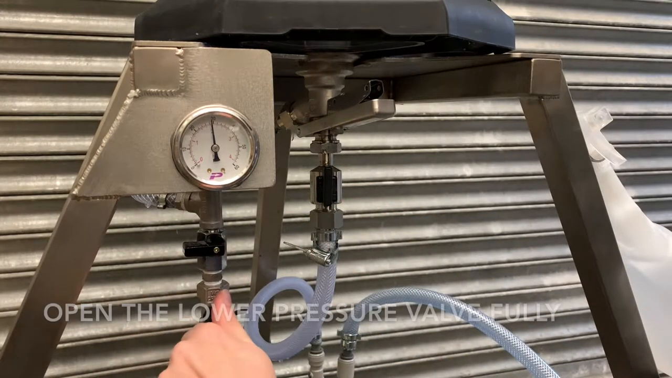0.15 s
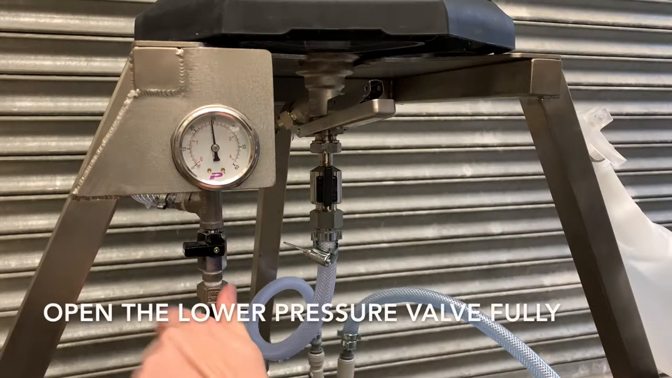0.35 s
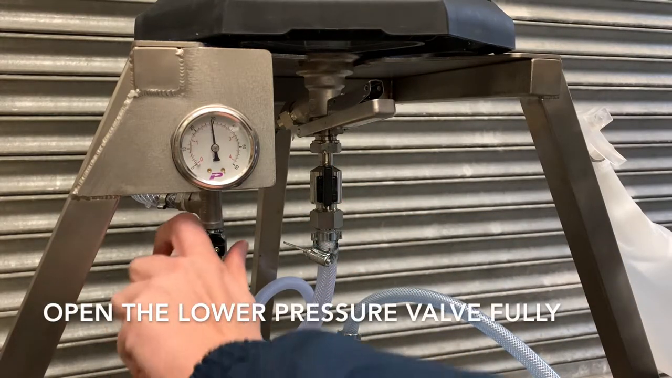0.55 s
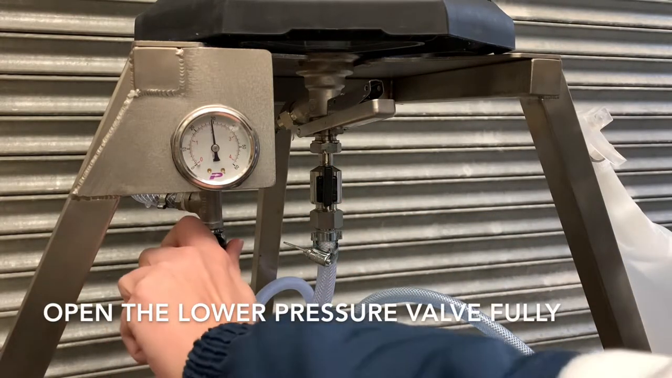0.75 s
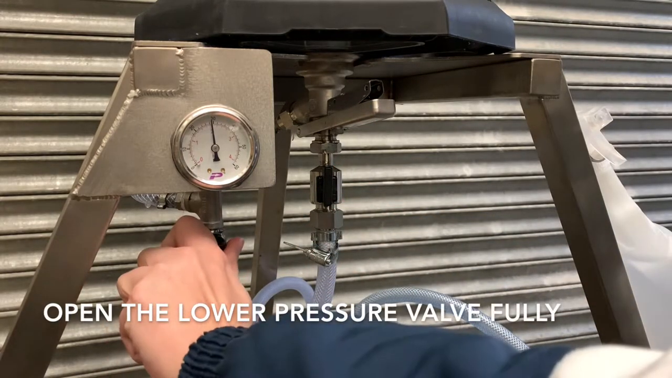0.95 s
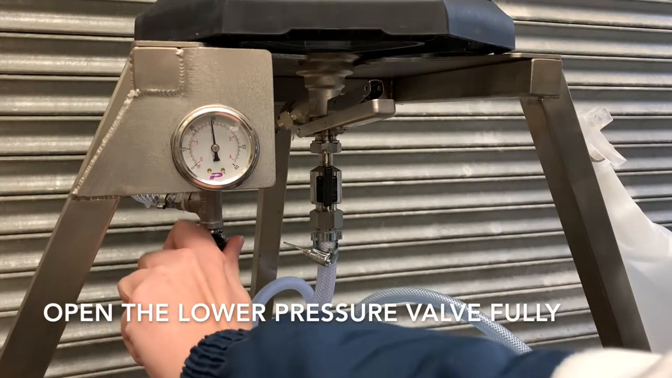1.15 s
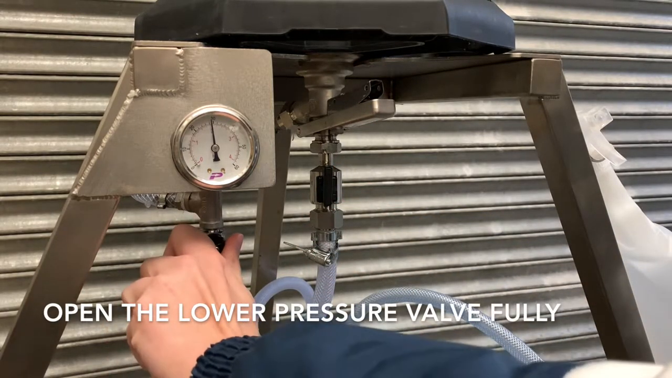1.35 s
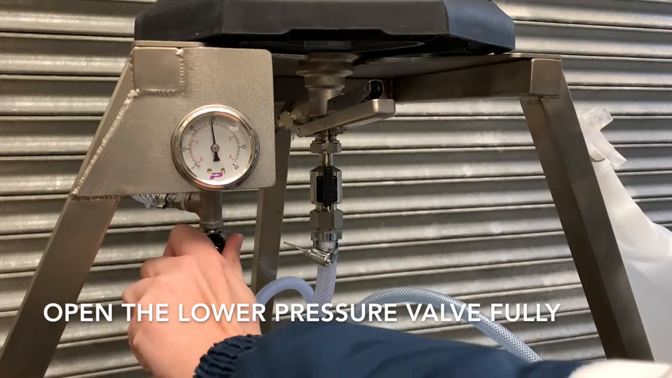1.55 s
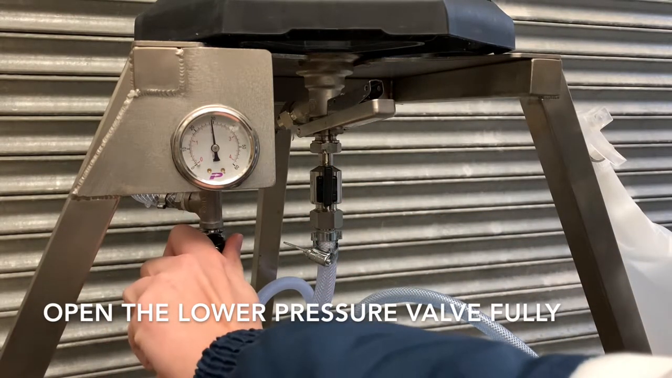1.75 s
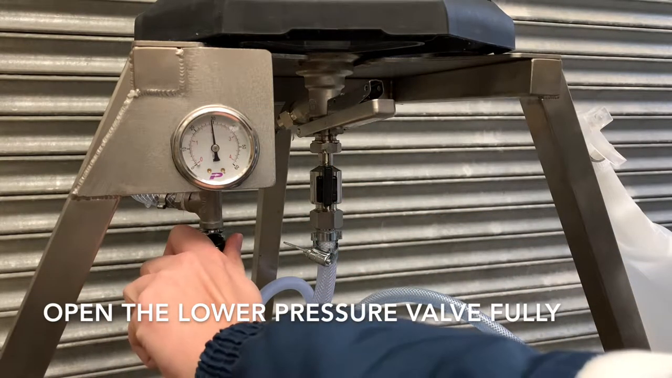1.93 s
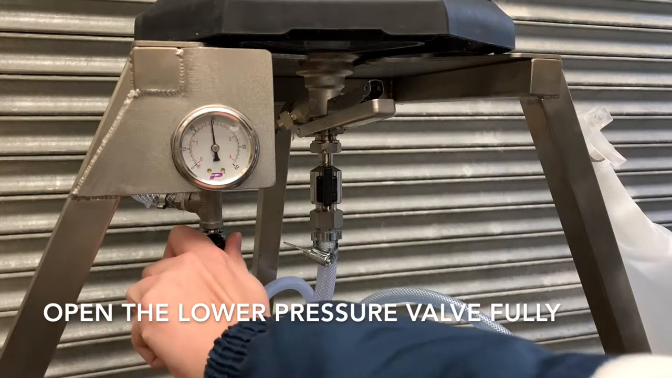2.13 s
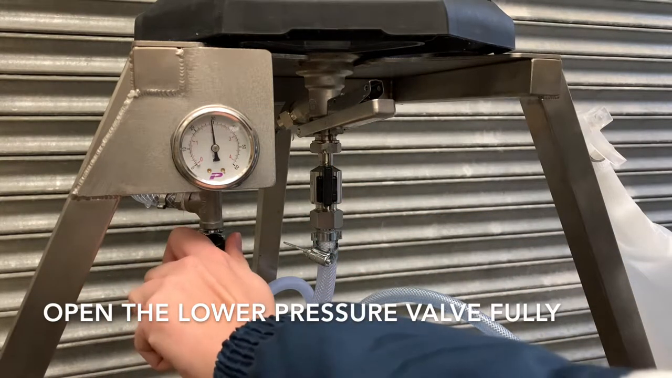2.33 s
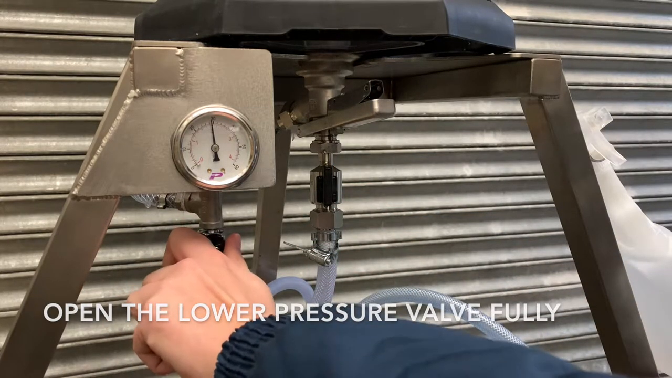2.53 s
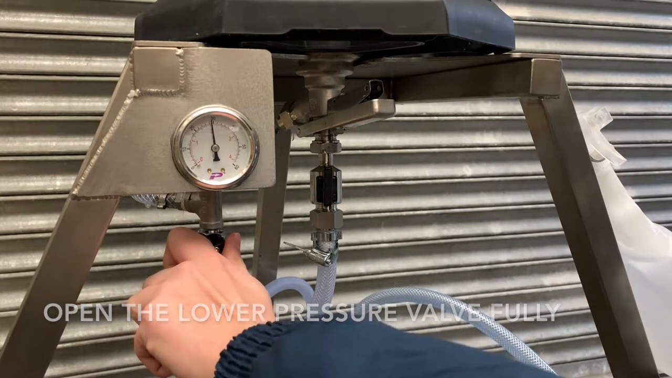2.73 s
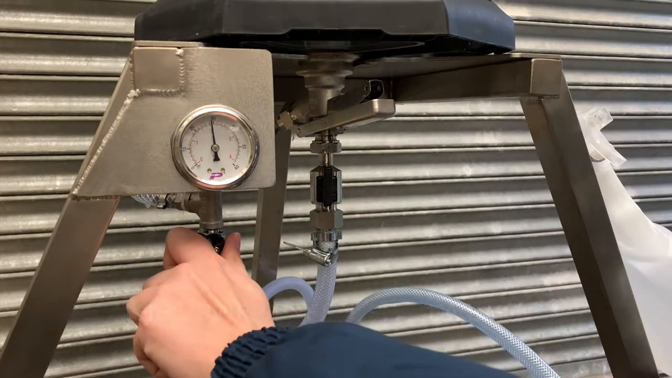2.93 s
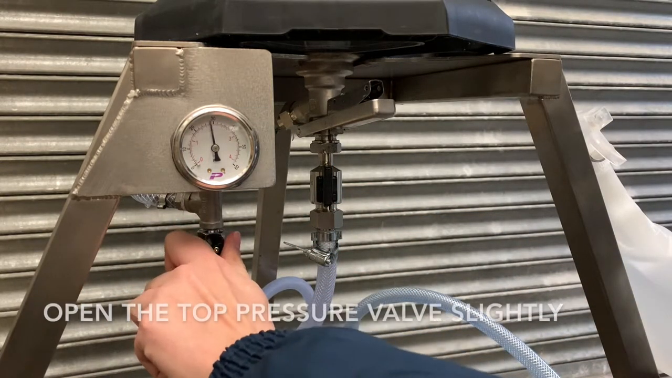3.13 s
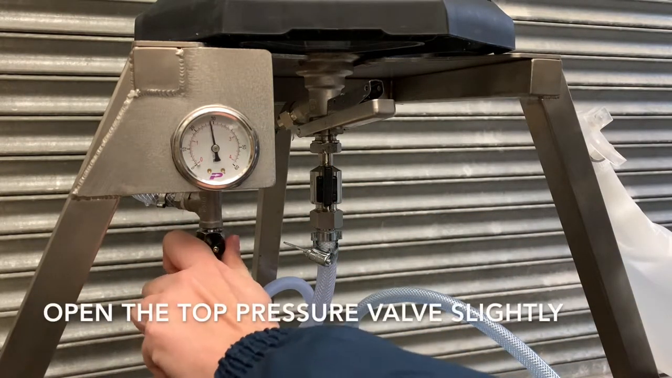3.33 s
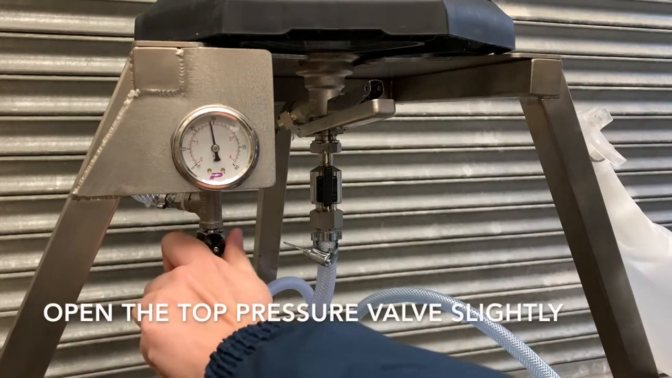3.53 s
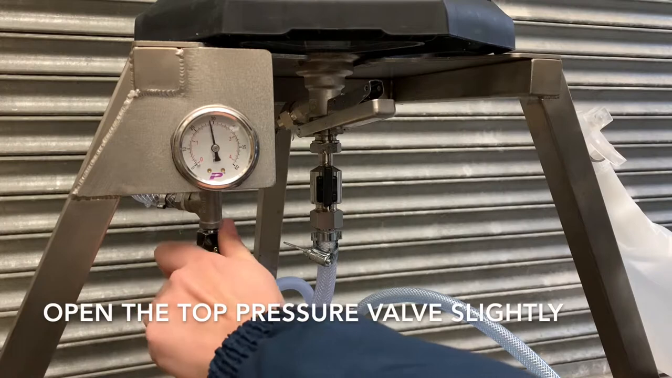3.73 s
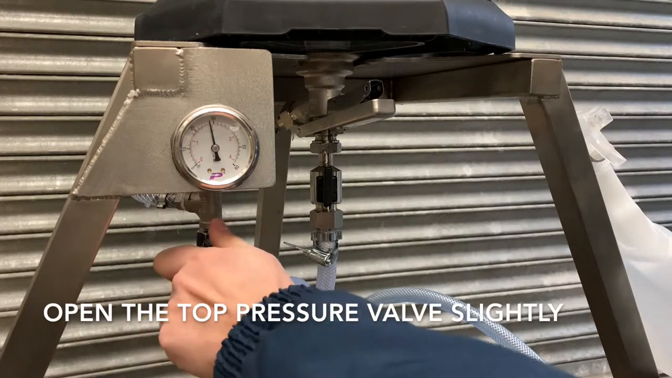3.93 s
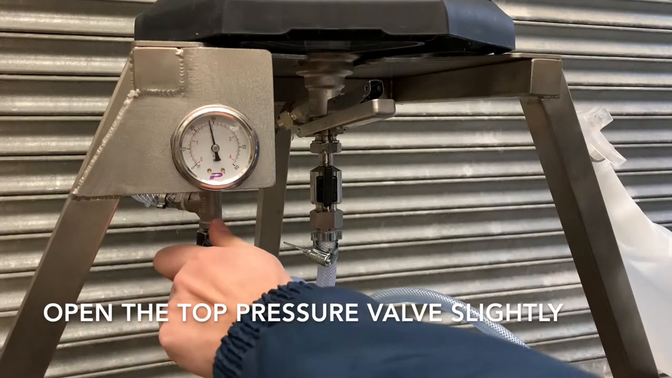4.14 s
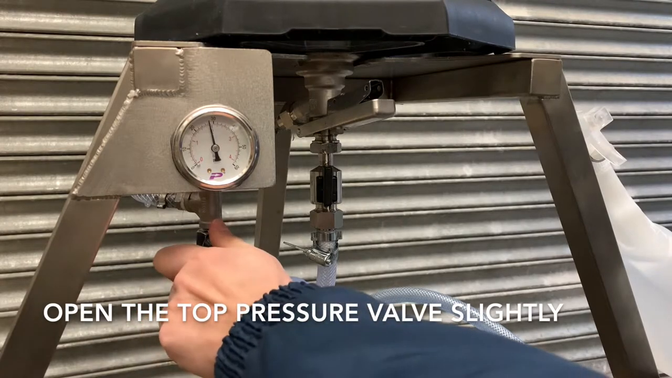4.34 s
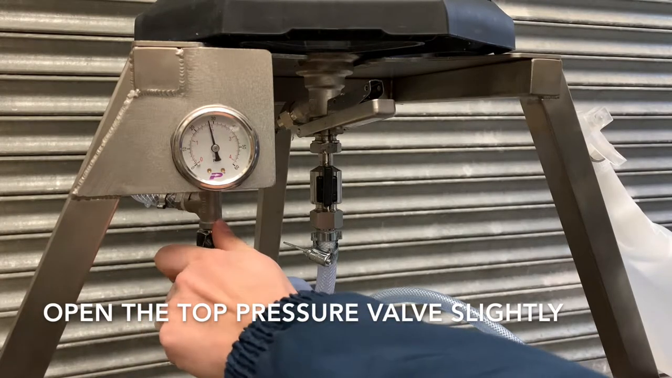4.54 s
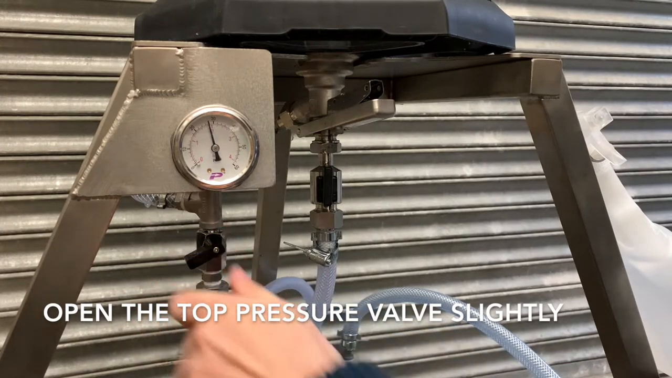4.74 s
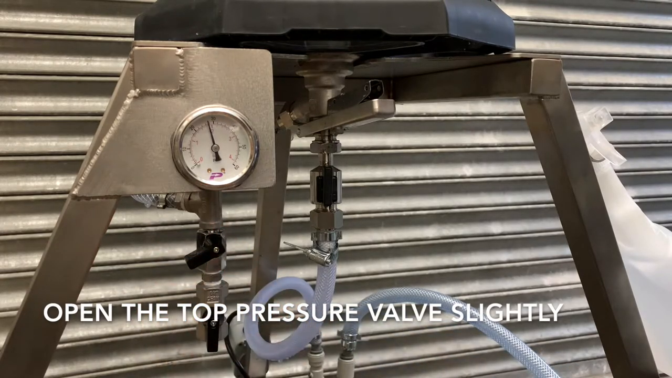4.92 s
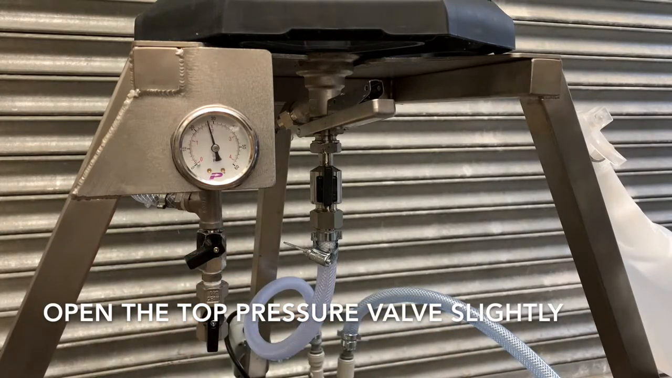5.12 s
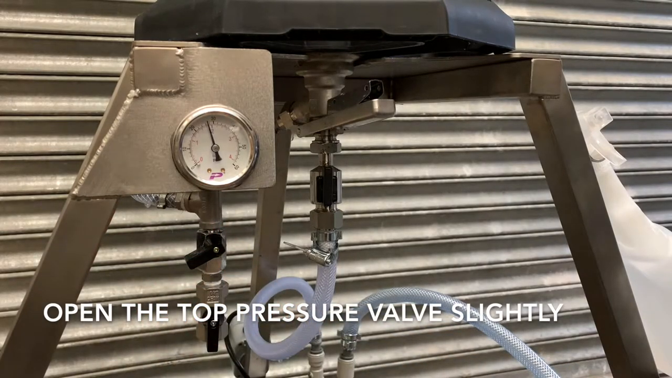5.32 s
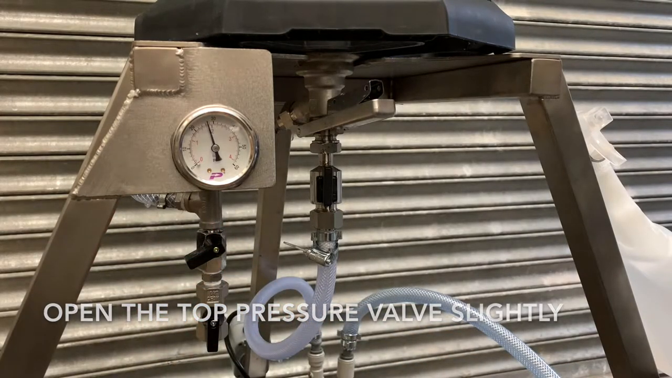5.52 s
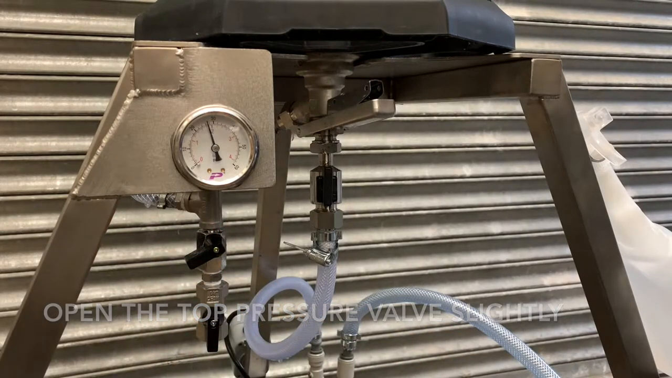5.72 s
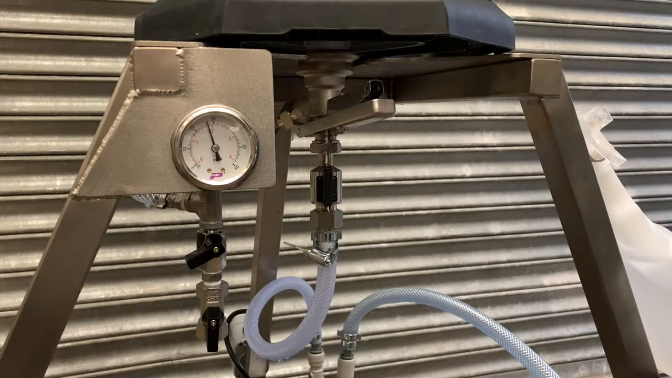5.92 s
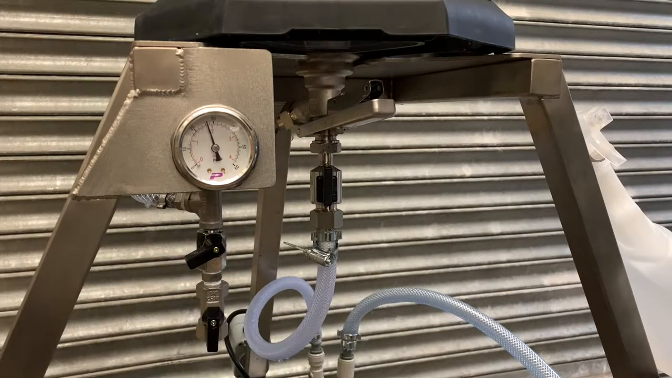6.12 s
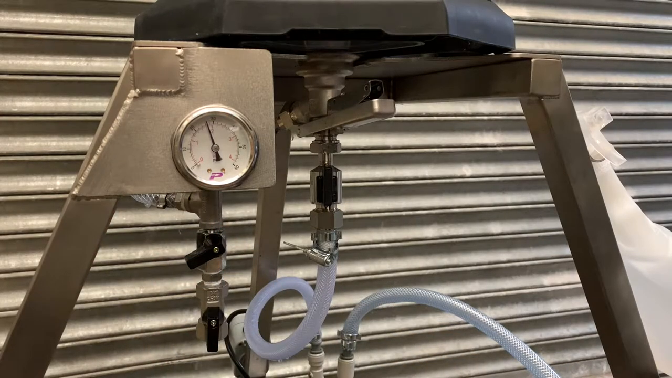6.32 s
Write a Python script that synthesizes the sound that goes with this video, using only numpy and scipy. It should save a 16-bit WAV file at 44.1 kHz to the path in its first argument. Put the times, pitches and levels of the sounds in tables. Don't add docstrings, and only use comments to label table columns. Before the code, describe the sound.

Faint machine hum, a tiny handle tick, thin leaking gas, then a sudden bright, spitting gas burst that eases into a steady metallic hiss.

```python
import sys
import numpy as np
from scipy import signal
from scipy.fft import rfft, irfft
from scipy.io import wavfile
from scipy.ndimage import uniform_filter1d

SR = 44100
rng = np.random.default_rng(int(sys.argv[2]) if len(sys.argv) > 2 else 0)


def magnitude_from_level(level_db):
    exponent = np.asarray(level_db, float) / 20
    return 10 ** exponent


def store_pcm(level_fs):
    pcm = np.round(np.clip(level_fs, -1, 1) * 32767).astype(np.int16)
    wavfile.write(sys.argv[1], SR, np.atleast_2d(pcm).T)


N = 285327
SIZE, HOP = 2048, 512
FRAMES = N // HOP + 2
BIN_HZ = np.fft.rfftfreq(SIZE, 1 / SR)

# time in seconds, jet level in dB.
RUSH = [
    (3.043, -44),
    (3.068, -23),
    (3.09, -18.5),
    (3.14, -21.5),
    (3.283, -20.5),
    (3.305, -24.5),
    (3.5, -24),
    (3.85, -28.5),
    (4.52, -30),
    (4.9, -25.5),
]
# start in seconds, level in dB, pitch in Hz.
SPITS = [
    (3.071, -35.5, 400),
    (3.116, -27, 360),
    (3.198, -33.5, 302),
    (3.240, -35.5, 454),
    (3.469, -41, 400),
    (3.542, -30, 410),
    (3.680, -38, 250),
]
RUSH_START_S = RUSH[0][0]


def evened(x):
    return x / np.sqrt(np.mean(x ** 2) + 1e-20)


def read(f, value, hz):
    return np.interp(np.log(hz + 1), np.log(np.asarray(f) + 1), value)


def ramp(t, start, length):
    return np.clip((t - start) / length, 0, 1)


def drift(slow_hz, fast_hz):
    f = np.fft.rfftfreq(N, 1 / SR)
    shape = 1 / np.sqrt(f + slow_hz) / (1 + (f / fast_hz) ** 4) * (f > slow_hz / 2)
    return evened(irfft(rfft(rng.standard_normal(N)) * shape, N))


def port_noise(field_db, patchy_db, ripple_db, likeness):
    # frequency in Hz, likeness from 0 to 1, left minus right in dB.
    ports = [(60, .99, -1.9), (200, .85, -1.5), (700, .8, -.9), (2200, .9, -.2), (3600, .8, -2.8),
             (5400, .82, -6), (6000, .68, -1.5), (6900, .62, 1.5), (7700, .88, .7), (9300, .98, 0),
             (10300, .8, 0), (11400, .99, 0), (14000, .96, 0), (15600, .84, 0)]
    knee_hz, turn_hz = 4660, 4610
    bins = len(BIN_HZ)
    a, b, c, d, patches = rng.standard_normal((field_db.shape[1], bins, 5)).T
    patches = uniform_filter1d(patches, size=14, axis=0)
    patches = evened(uniform_filter1d(patches, size=6, axis=1))
    ripple = evened(uniform_filter1d(rng.standard_normal((bins, 1)), size=2, axis=0))
    skew = evened(uniform_filter1d(rng.standard_normal((bins, 1)), size=9, axis=0))

    port_hz, same, balance_db = np.transpose(ports)
    same = np.clip(likeness * read(port_hz, same, BIN_HZ), 0, 1)[:, None]
    half = magnitude_from_level(read(port_hz, balance_db, BIN_HZ) / 2)[:, None]
    lead = 2 * np.pi * np.maximum(BIN_HZ - knee_hz, 0)[:, None] / turn_hz
    lead = lead + 3 * (1 - same) * skew
    left = a + 1j * b
    right = (same * left + np.sqrt(1 - same ** 2) * (c + 1j * d)) * np.exp(1j * lead)
    z = np.array([left * half, right / half])
    z = z * magnitude_from_level(field_db + patchy_db * patches + ripple_db * ripple)
    return signal.istft(z, nperseg=SIZE, noverlap=SIZE - HOP)[1][:, :N]


def hiss():
    # time in seconds, setting (0 leak, 1 rush, 2 settled).
    valve_turns = [
        (3.02, 0),
        (3.05, 1),
        (3.6, 1),
        (4.1, 1.4),
        (4.65, 1.45),
        (4.92, 2),
    ]
    # frequency in Hz, level in dB for leak, rush and settled.
    jet = np.array([(150, -30, -34, -37), (300, -22, -18, -36), (600, -18, -14, -21), (850, -20, -5, -13),
                    (1300, -20, -4, -20), (1900, -14, -6, -13), (2700, -24, -10, -12), (3300, -12, -3, -3),
                    (4500, -9, -2, -9), (6300, -10, -3, -2), (8400, -3, -2, 1), (10300, -6, -3, -6),
                    (13000, -7, -4, -4), (15600, -1, -7, -2)])
    # frequency in
    # Hz, width in Hz, level in dB for leak, rush and settled.
    resonances = [(830, 120, -5, -6, -14), (1060, 150, 5, 5, 3), (1300, 300, -25, -12, -5),
                  (1500, 120, -10, -1, -5), (2160, 190, -25, -10, -14), (2420, 300, -12, -6, -15),
                  (2980, 200, -9, -2, -25), (3150, 50, -13, -5, -4), (3575, 110, 5, 8, 10), (3670, 220, 7, 3, 0),
                  (3960, 200, 1, 0, -2), (4340, 170, -2, -4, -2),
                  (4770, 240, 3, 4, -1), (5110, 150, 6, 5, 2), (5290, 140, 12, 7, 3), (5500, 320, 7, 6, 8),
             (5790, 340, -6, 2, 6), (6100, 270, -4, -1, 1), (6470, 210, -3, -25, -6),
             (6710, 110, 0, 2, -25),
                  (6990, 300, 3, 1, -11), (7280, 130, 14, 12, 11), (7450, 90, 11, 4, 5), (7590, 170, 6, 7, 9),
                (7770, 130, 10, 8, 8), (8080, 120, 8, 11, 8), (8290, 220, 0, -4, 2), (8690, 150, 1, 2, 3),
                (8870, 300, 3, -1, -25), (9390, 200, 7, 2, 6), (9570, 120, 5, 4, 4), (9750, 120, 2, 6, 7),
                (10140, 110, -10, -6, 3), (10600, 450, -25, -10, 1),
                  (11260, 130, 2, 0, 4), (11580, 110, 4, 1, 5), (11960, 300, 3, -6, 4), (12090, 80, 11, 2, -7),
              (12340, 170, 12, 2, 7), (12720, 300, 5, -3, 2), (13370, 80, 0, -1, 0), (13950, 110, 2, 3, -5),
              (14290, 110, 4, 5, -9), (14510, 120, 2, 2, -2), (14800, 120, 9, 0, 5), (15000, 150, 9, 3, -3),
              (15350, 140, 6, 4, -6), (15570, 160, 2, 2, -1)]
    # frequency in Hz, width in Hz, depth in dB.
    notches = [(960, 50, 5), (1270, 45, 6), (1610, 60, 5), (2700, 70, 6), (3470, 60, 4), (4150, 70, 4),
               (4560, 80, 6), (4930, 90, 5), (5370, 60, 2.5), (7090, 70, 4), (10650, 90, 5), (11080, 90, 5),
               (11420, 80, 4), (12220, 70, 5)]

    hz, frame_s = BIN_HZ, np.arange(FRAMES) * HOP / SR
    modes = np.array(resonances)
    bells = 1 / (1 + (2 * (hz[:, None] - modes[:, 0]) / modes[:, 1]) ** 2) ** 2
    setting = np.interp(frame_s, *np.transpose(valve_turns))
    field_db = np.zeros((len(hz), FRAMES))
    for k in range(3):
        power = read(jet[:, 0], magnitude_from_level(2 * jet[:, k + 1]), hz) + bells @ magnitude_from_level(2 * modes[:, k + 2])
        colour_db = 10 * np.log10(power / power.sum())
        field_db += np.outer(colour_db, np.clip(1 - abs(setting - k), 0, 1))

    roar_db, sizzle_db, throat_db = shading(frame_s)
    field_db += np.outer(1 / (1 + (hz / 2900) ** 6), roar_db)
    field_db += np.outer(1 / (1 + (6300 / (hz + 1)) ** 8), sizzle_db)
    field_db += np.outer(1 / (1 + ((hz - 5300) / 650) ** 4), throat_db)
    for notch_hz, width_hz, depth_db in notches:
        field_db -= depth_db / (1 + (2 * (hz[:, None] - notch_hz) / width_hz) ** 2)

    gas = evened(port_noise(field_db, patchy_db=1.0, ripple_db=2.2, likeness=1))
    flutter_db = .5 * drift(5., 50.) + .6 * drift(40., 600.)
    return gas * magnitude_from_level(flow_db(np.arange(N) / SR) + 5.0 + flutter_db)


def flow_db(t):
    # time in seconds, jet level in dB.
    leak = [
        (1.261, -47),
        (1.277, -40.5),
        (1.6, -41.5),
        (2.13, -43.5),
        (2.5, -46),
        (2.7, -44.5),
        (2.93, -42),
        (3.03, -49.5),
    ]
    # start in seconds, end in seconds, depth in dB.
    stalls = [
        (1.626, 1.789, 15.5),
        (1.789, 1.814, 13),
    ]
    choke_share, free_s = 0.37, .012
    level_db = np.interp(t, *np.transpose([*leak, *RUSH]), left=-150)
    for start, end, depth_db in stalls:
        closing = ramp(t, start, choke_share * (end - start))
        level_db = level_db - depth_db * closing * (1 - ramp(t, end - free_s, free_s))
    return level_db


def shading(t):
    grip_s, let_go_s = 3.17, 4.37
    opened = ramp(t, RUSH_START_S, RUSH[1][0] - RUSH_START_S)
    let_go = ramp(t, let_go_s, 0.65)
    grip = ramp(t, grip_s, 0.78) * (1 - let_go)
    surge = opened * (1 - ramp(t, grip_s, .1))
    loudest_db = max(db for _, db, _ in SPITS)
    slugs = sum(magnitude_from_level(db - loudest_db) * np.exp(-((t - s) / 0.046) ** 2) for s, db, _ in SPITS)
    roar_db = 5 * (1 - opened) + 1 * let_go + 2 * grip + 3.5 * slugs
    sizzle_db = 4 * grip
    throat_db = -2.5 * grip + 3.5 * surge
    return roar_db, sizzle_db, throat_db


def spits():
    out, t = np.zeros(N), np.arange(900) / SR
    for s, db, hz in SPITS:
        push = np.sin(2 * np.pi * hz * t) * np.exp(-1.6 * hz * t) * 1.34
        out[round(s * SR) - 60:][:len(t)] += magnitude_from_level(db) * push
    return out * magnitude_from_level([[-.8], [.8]])


def ticks():
    # time in seconds, level in dB.
    taps = [
        (.76, -80),
        (.82, -80),
        (1.1, -62),
    ]
    centre_hz, half_width_hz, rise_s = 13800, 900, .003
    out, t = np.zeros(N), np.arange(600) / SR
    band_hz = [centre_hz - half_width_hz, centre_hz + half_width_hz]
    band = signal.butter(4, band_hz, "band", fs=SR, output="sos")
    for s, db in taps:
        puff = evened(signal.sosfilt(band, rng.standard_normal(len(t))))
        puff = puff * t / rise_s * np.exp(1 - t / rise_s)
        out[round(s * SR) - 150:][:len(t)] += magnitude_from_level(db) * puff
    return out


def compressor():
    # frequency in Hz, level in dB.
    casing = [(66.8, -42), (99.8, -58)]
    # frequency in Hz, level in dB.
    fan = [(836, -70), (926, -70), (1077, -62), (1124, -64), (1448, -66)]
    slots_db = [-68, -63, -64, -71, -65, -66, -57, -61]
    slot_hz = 325.5
    t = np.arange(N) / SR
    hum = np.zeros(N)
    for hz, db in casing:
        swell = magnitude_from_level(db + 0.49 * drift(4.3, 10.))
        hum += swell * np.sin(2 * np.pi * (hz * t + rng.random()) + 0.21 * drift(.5, 6.4))

    lines = [*fan, *((slot_hz * (k + 1), db) for k, db in enumerate(slots_db))]
    waver = [drift(1.0, 16.0) for _ in range(3)]
    start = 2 * np.pi * rng.random((len(lines), 1, 1)) + .25 * rng.standard_normal((len(lines), 2, 1))
    whine = np.zeros((2, N))
    for k, (hz, db) in enumerate(lines):
        phase = 2 * np.pi * hz * t + 0.27 * waver[k % 3 - 1] + start[k]
        whine += magnitude_from_level(db + 1.94 * waver[k % 3]) * np.sin(phase)
    return np.sqrt(2) * (hum * magnitude_from_level([[-1.1], [.9]]) + whine)


def room():
    # frequency in Hz, level in dB per Hz.
    air = [(20, -13), (48, 0), (110, -4), (350, -15), (1100, -20), (1750, -21.5), (2400, -20.5),
           (3100, -27), (3600, -30), (5200, -30.5), (5600, -39), (7000, -37), (10500, -51), (13800, -56)]
    level_db = -45.5
    field_db = np.repeat(read(*np.transpose(air), BIN_HZ)[:, None], FRAMES, axis=1)
    return magnitude_from_level(level_db) * evened(port_noise(field_db, patchy_db=1.4, ripple_db=.8, likeness=.92))


def scene():
    t = np.arange(N) / SR
    fade = ramp(t, .602, 0.35) ** 1.02
    duck_db = -12 * (1 - np.exp(-np.maximum(t - RUSH_START_S, 0) / 0.31))
    background = (room() + compressor()) * fade * magnitude_from_level(0.74 + duck_db)
    return background + ticks() + spits() + hiss()


def top_cut(x):
    return signal.sosfilt(signal.butter(12, 16860, fs=SR, output="sos"), x)


def record(dry):
    low_cut_hz, edge_hz = 42, 15730
    cut = signal.sosfilt(signal.butter(2, low_cut_hz, "high", fs=SR, output="sos"), dry)
    band_limit = signal.firwin(1023, edge_hz, window=("kaiser", 10), fs=SR)
    limited = signal.oaconvolve(cut, band_limit[None], "same")
    return top_cut(limited)


dry = scene()
out = record(dry)
store_pcm(out)
```